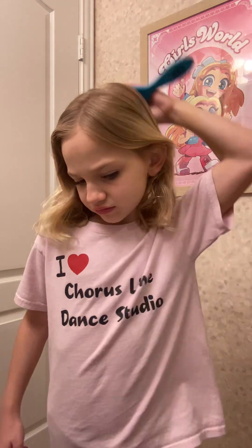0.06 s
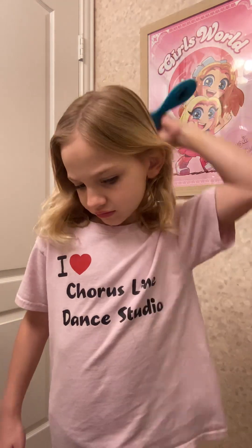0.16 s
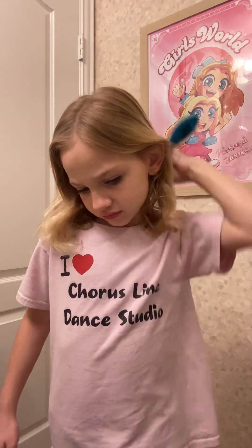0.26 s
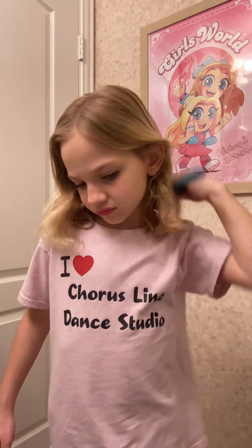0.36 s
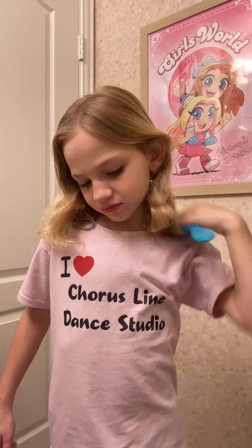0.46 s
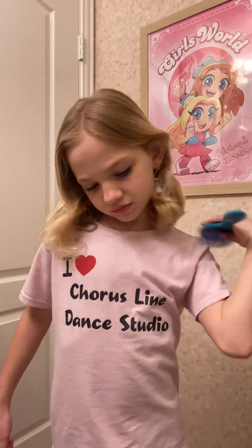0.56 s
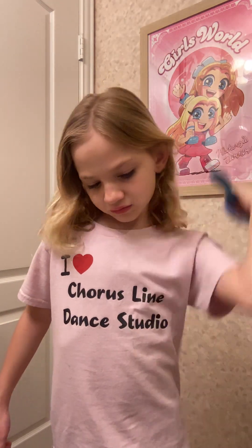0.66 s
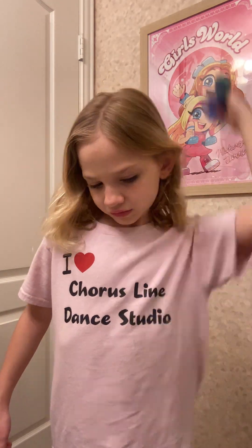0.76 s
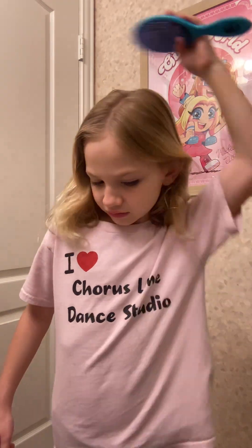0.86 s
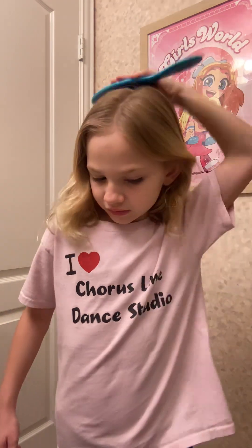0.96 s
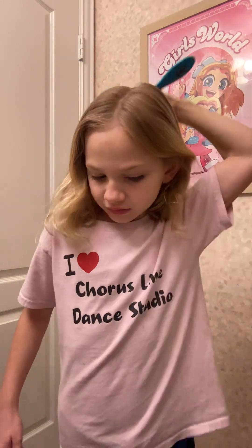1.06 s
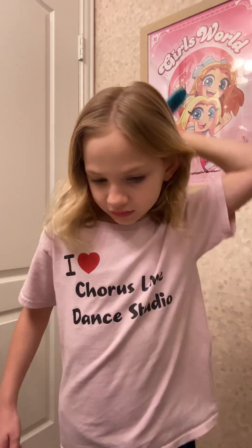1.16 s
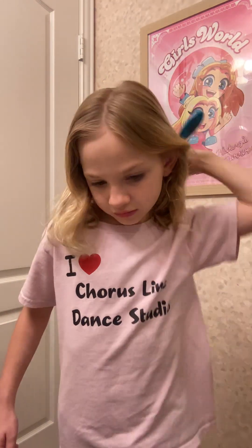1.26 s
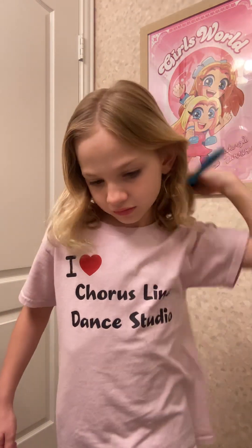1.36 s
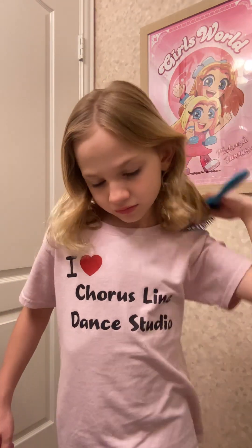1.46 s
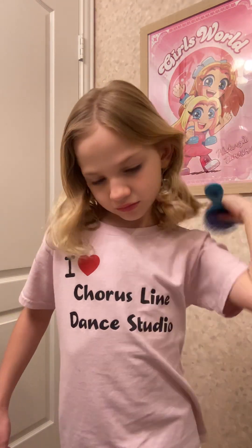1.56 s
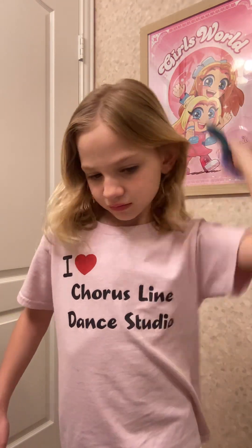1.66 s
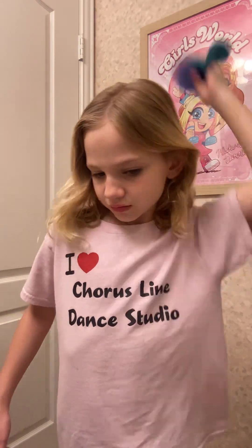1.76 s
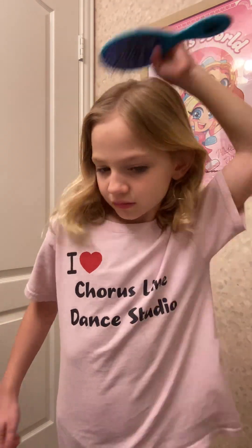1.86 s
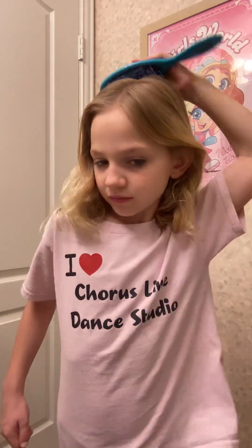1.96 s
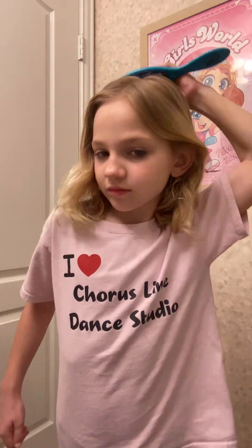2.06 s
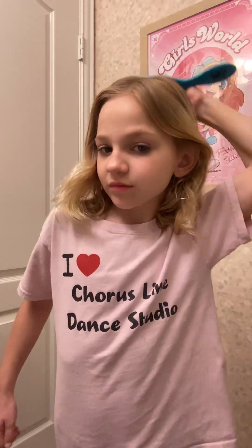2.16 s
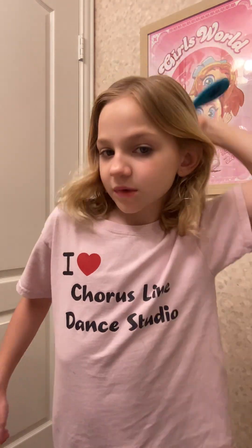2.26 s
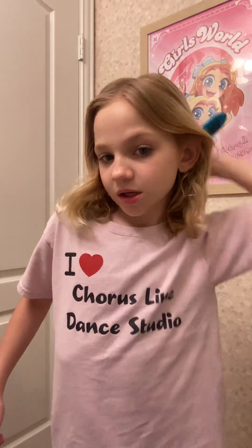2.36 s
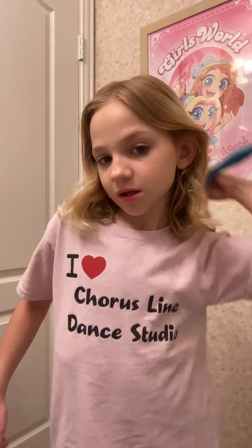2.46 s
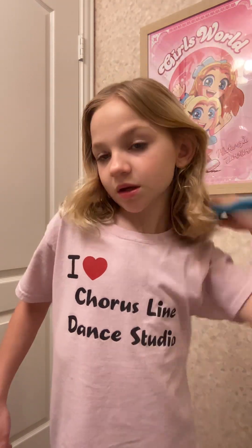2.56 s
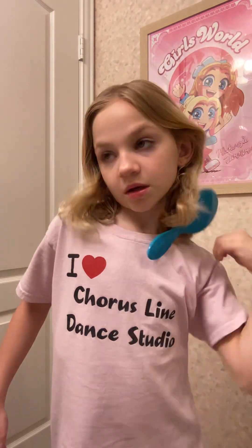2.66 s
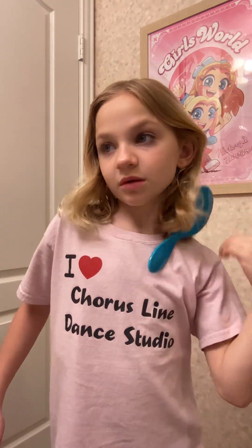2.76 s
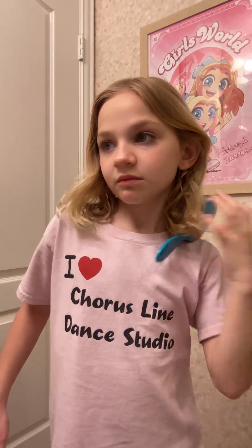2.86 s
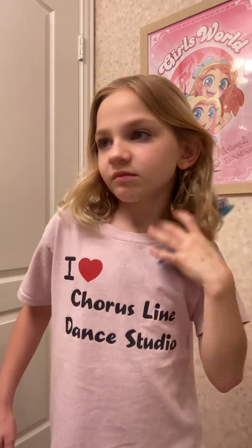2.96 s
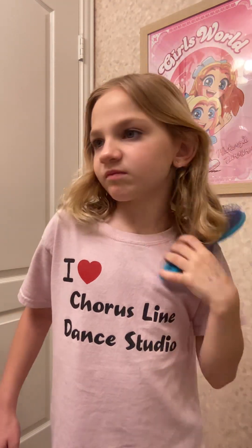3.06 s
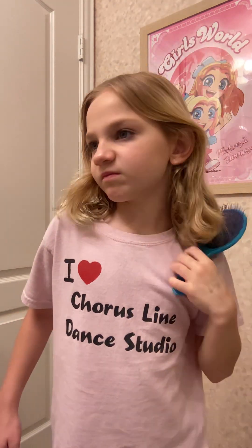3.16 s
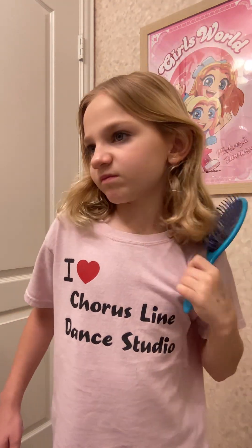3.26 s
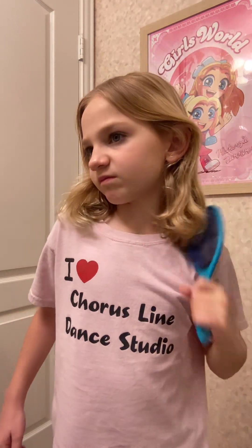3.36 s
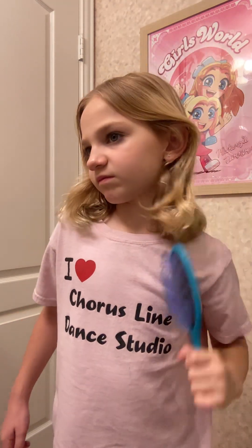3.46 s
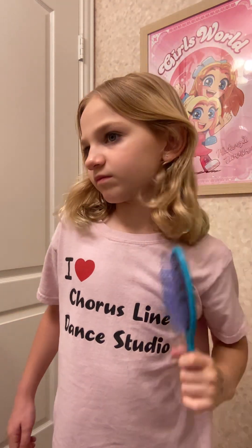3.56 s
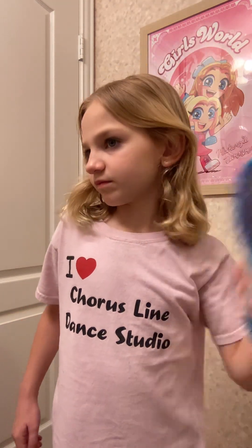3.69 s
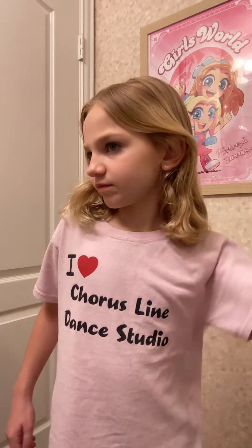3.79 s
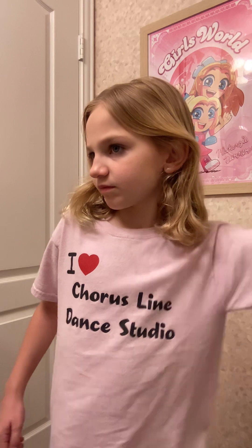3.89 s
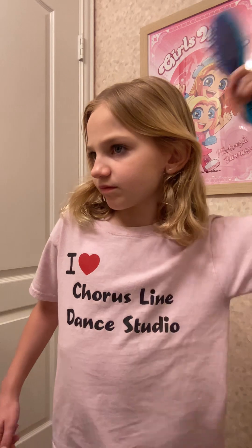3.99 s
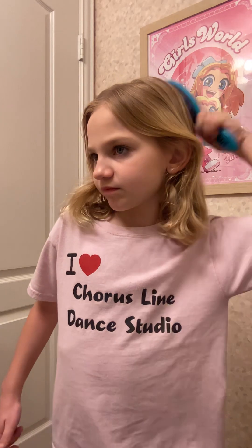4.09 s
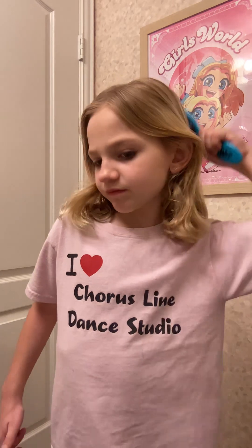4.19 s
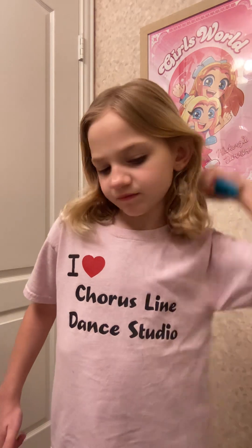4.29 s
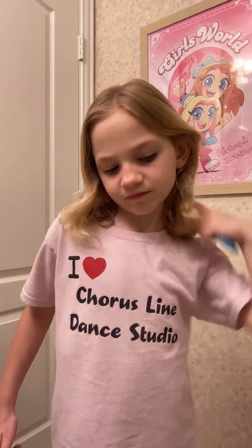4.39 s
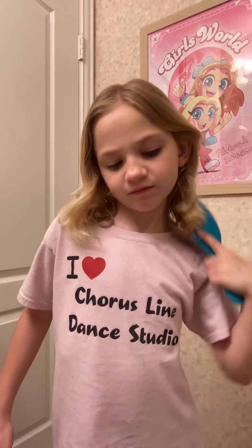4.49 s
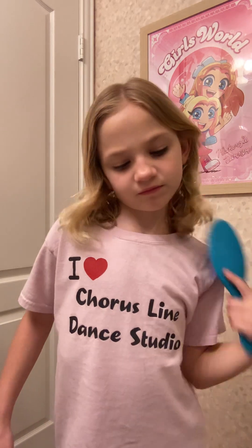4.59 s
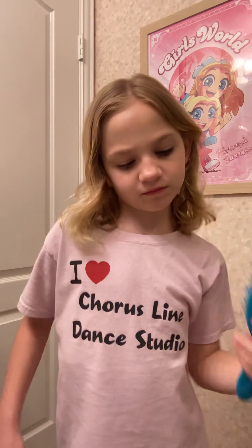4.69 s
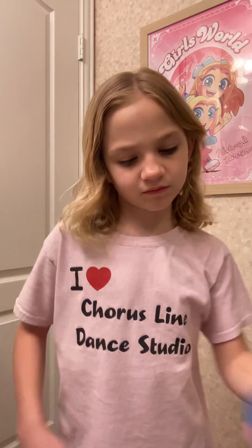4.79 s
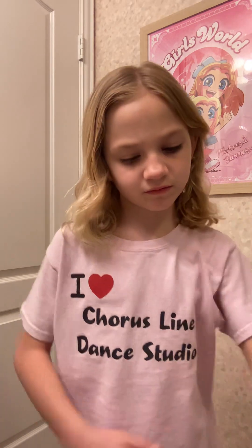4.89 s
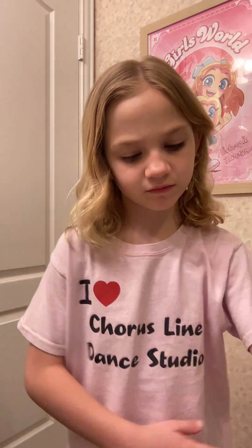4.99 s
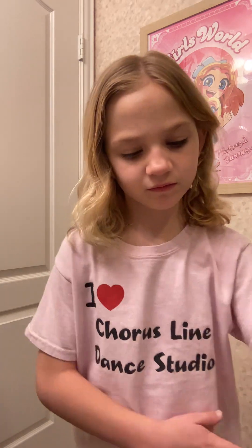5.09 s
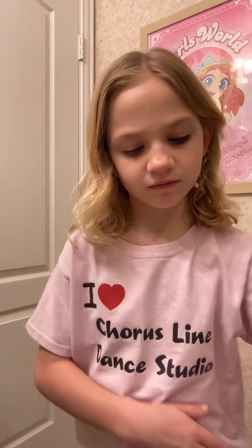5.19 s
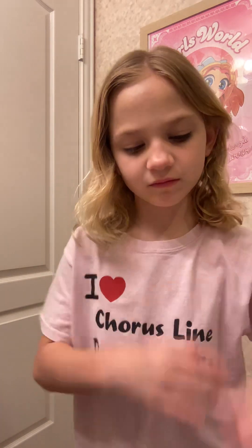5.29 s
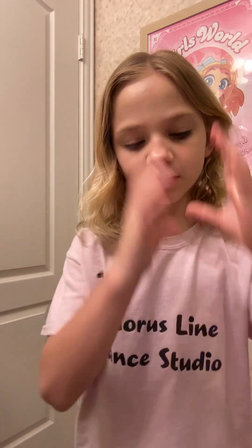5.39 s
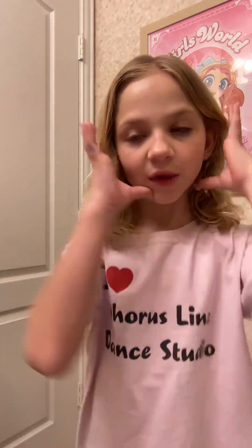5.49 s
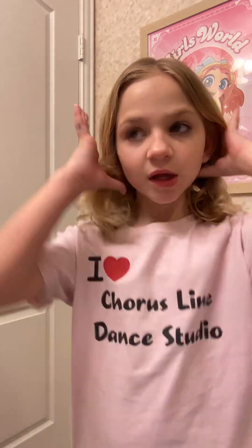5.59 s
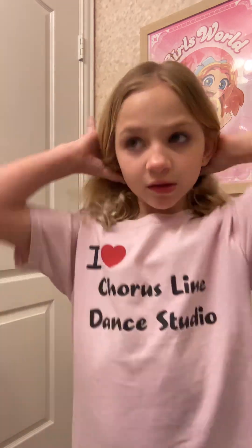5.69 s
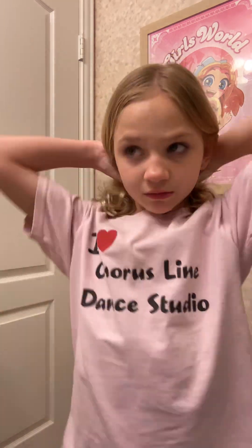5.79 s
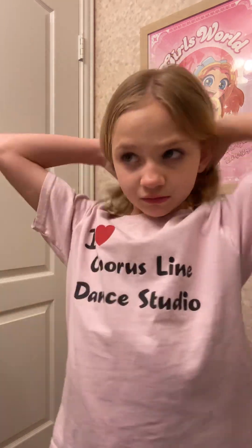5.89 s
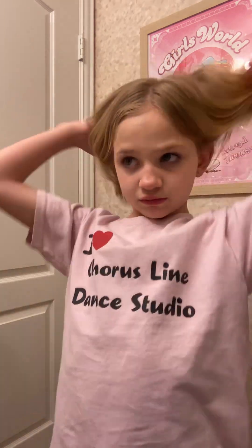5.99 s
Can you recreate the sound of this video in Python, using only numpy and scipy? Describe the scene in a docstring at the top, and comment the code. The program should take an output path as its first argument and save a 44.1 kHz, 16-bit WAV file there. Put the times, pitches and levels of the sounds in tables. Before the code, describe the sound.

A plastic hairbrush is pulled through long hair about a step from the microphone, in a small room with a short echo. Soft, scratchy strokes come at about 0 to 0.6 seconds, 1 to 1.5 seconds and, more quietly, 2.1 to 2.6 seconds. Light plastic taps and snags dot the strokes, with dull bumps against head and shoulder near 1.9 and 2.6 seconds. After a lull with one very faint rasp at 3.4 seconds, a fourth stroke runs from 4.2 to 4.6 seconds and trails off. At 4.9 seconds the brush clatters sharply onto a counter, by far the loudest sound, with smaller knocks and low thumps through the furniture until 5.3 seconds. From 5.5 to 6 seconds, a couple of tiny ticks lead into hands rustling faintly through hair. A quiet low motor hum and a thin, flickering high hiss continue underneath throughout.

```python
"""A plastic paddle brush is pulled through long hair in a small hard room, a step from the listener.
In four strokes, stick-slip friction of bristle on strand rings the paddle, which also bumps head and
shoulder. Near 5 s the brush clatters onto a counter, with dull thumps through the furniture.
Last, hands rustle through the hair. Throughout, a motor hums under a thin high hiss."""
import sys
import numpy as np
from scipy import signal
from scipy.fft import rfft, irfft
from scipy.io import wavfile
from scipy.ndimage import uniform_filter1d

SR = 44100
rng = np.random.default_rng(int(sys.argv[2]) if len(sys.argv) > 2 else 0)


def master_out(mix):
    """Clip the mix to full scale and print it as 16-bit PCM to the path in sys.argv[1]."""
    frames = np.transpose(np.atleast_2d(mix))
    ceiling = np.clip(frames, -1, 1)
    pcm = np.round(ceiling * 32767).astype(np.int16)
    wavfile.write(sys.argv[1], SR, pcm)


N = 266576
T = np.arange(N) / SR


# Friction bands in the order drone, rasp, hiss: (low edge [Hz], high edge [Hz])
FRICTION_BANDS = [(300, 1050), (1200, 3300), (4200, 12950)]
# Pulls through hair, two faint breath-like rasps and, last, fingers: (start [s], full speed [s],
# full load [s], release [s], drone gain [dB], rasp gain [dB], hiss gain [dB])
STROKE_GESTURES = [(0.021, 0.206, .4, 0.52, -47.5, -50.5, -48.5),
                   (0.952, 1.165, 1.346, 1.49, -50.5, -51.5, -49.5),
                   (2.087, 2.3, 2.344, 2.543, -57, -58, -53),
                   (3.321, 3.362, 3.42, 3.416, -65.5, -66, -70.5), (4.16, 4.292, 4.44, 4.6, -52, -52, -55),
                   (4.624, 4.64, 4.66, 5.06, -73.5, -67, -82),
                   (5.606, 5.94, 5.93, 6.03, -79.5, -67.5, -62.5)]
def strokes():
    """Friction noise: drone and rasp grow with load, hiss with speed; snags make each band uneven."""
    touch_s, release_db_per_s, snag_db = 0.032, 265.5, 2
    onset_db = np.array([[-19.5], [-10], [-17]])  # per band, relative to full drive
    gains = np.zeros((3, N))
    for start, fast, loaded, release, *full_db in STROKE_GESTURES:
        speed, load = (np.clip((T - start) / (full - start), 0, 1) for full in (fast, loaded))
        drive = np.array([load, load, speed])
        db = np.array(full_db)[:, None] + onset_db * (1 - drive)
        db -= release_db_per_s * np.maximum(T - release, 0)
        gains += np.clip((T - start) / touch_s, 0, 1) * undb(db)
    out = 0
    for gain, (lo, hi), bare_db in zip(gains, FRICTION_BANDS, (5, 0.5, 0.5)):
        rub = paddle(slips()) + undb(bare_db) * slips()  # some slips ring the paddle, others are bare
        snags = undb(snag_db * walk(40))
        out += gain * snags * level(band(rub, lo, hi), -8)
    return out


def slips(per_s=4000, spread_db=2.5):
    """Stick-slip friction: bristles slip over strands in a Poisson train of uneven impulses."""
    slipping = rng.random(N) < per_s / SR
    return slipping * rng.standard_normal(N) * undb(spread_db * rng.exponential(size=N))


# Modes of paddle and cushion: (frequency [Hz], relative level [dB], decay time T60 [s])
PADDLE_MODES = [(381, -2.5, 0.028), (874, 4, 0.012), (1130, -32.5, 0.0076), (1390, -12, 0.012),
                (1830, -7, 0.023), (2137, 0.5, 0.015), (2574, 6.5, 0.0072), (3393, -1.5, 0.012),
                (3860, -5, 0.0089), (5120, -9, 0.015), (5630, -5.5, 0.0082), (7080, -2.5, 0.014),
                (9150, -27, 0.0082)]
def paddle(force):
    """Modal superposition: the force is convolved with a unit-energy sum of damped sinusoids."""
    t = T[:SR // 8]
    ring = sum((-1) ** k * undb(db) * np.sin(2 * np.pi * hz * t) * 1000 ** (-t / t60)
               for k, (hz, db, t60) in enumerate(PADDLE_MODES))
    return convolve_unit_energy(force, ring)


# Bumps, snags and clatter of the brush: (time [s], gain [dB], hardness tilt [dB/octave],
# spot resonance [Hz], its width [Hz], its level over the rattle [dB], contact decay time [ms])
IMPACTS = [(.012, -54, -3, 774, 403, 10, 4.5), (.132, -48.5, 4, 5050, 3020, -1.5, 3.4),
           (.212, -67, 3, 705, 200, 12, 3.3), (.324, -57.5, -3, 3440, 60, 7, 9.9),
           (.488, -48.5, 2, 2240, 1500, 8.5, 3.7), (.965, -54.5, -3, 740, 350, 10.5, 5.8),
           (1.005, -57, -3.5, 660, 200, 9, 5.3), (1.132, -42.5, 9, 533, 200, -16, 2.3),
           (1.29, -50.5, -6, 824, 200, 3.5, 3.3), (1.399, -47, 1, 2430, 300, -5, 5.5),
           (1.429, -46, 1, 3480, 400, -8, 4.8), (1.909, -41.5, -0.8, 1574, 497, -9, 5.8),
           (2.275, -52.5, 3, 2630, 252, 19.5, 1.47), (2.379, -55, 4, 910, 300, 2.5, 3.2),
           (2.584, -40, -0.5, 1590, 596, -1.5, 3.8), (2.642, -52.5, -7, 565, 900, 2.5, 6.3),
           (2.979, -69.5, -11, 640, 298, 1.5, 4.3), (3.399, -72, -2, 734, 300, -3, 4.3),
           (4.102, -63, -2, 445, 407, 5, 5.7), (4.423, -46, 13, 700, 200, -9, 2.3),
           (4.631, -55.5, -0.5, 4000, 2000, 0.5, 3), (4.916, -17.5, 0.5, 880, 300, -1, 2.38),
           (4.928, -20, 2.2, 1800, 1000, 3, 2.15), (5.026, -27.5, 1, 2700, 200, -4.5, 1.8),
           (5.037, -31, 5, 1830, 200, -7.5, 2.5), (5.126, -43, -4, 2120, 1160, 0.5, 9.1),
           (5.223, -37, -2.5, 1110, 700, 7.5, 4.9), (5.236, -29, 1.5, 382, 250, 17, 1.31),
           (5.246, -31, -1, 5330, 1500, -0.5, 3.53), (5.258, -34.5, -1, 2370, 1210, 6.5, 3.5),
           (5.309, -38, -3, 397, 149, 11, 3.07), (5.516, -62, 12.5, 7500, 3060, 7, 1.8),
           (5.549, -55, 1.5, 4010, 4500, 16.5, 1.3), (5.863, -66, -8, 600, 494, -0.5, 4.7)]
def bumps(rise_ms=1.06, low_hz=227, top_hz=11700, bare_db=4):
    """Impact excitation: brief rattles of contacts, brighter when harder; the struck spot resonates."""
    t = T[:SR // 10]
    hz = np.maximum(np.fft.rfftfreq(len(t), 1 / SR), 1)
    highpass = 1 / (1 - 1j * low_hz / hz) ** 2
    lowpass = 1 / (1 - (hz / top_hz) ** 2 + 1j * hz / top_hz) ** 2
    rise = 1 - np.exp(-t * 1000 / rise_ms)
    force = np.zeros((2, N + len(t)))  # one row drives the paddle, the other is heard bare
    for s, db, hardness, spot_hz, width_hz, spot_db, decay_ms in IMPACTS:
        envelope = rise * np.exp(-t * 1000 / decay_ms)
        burst = rfft(rng.standard_normal((2, len(t))) * envelope)
        # many contacts together excite all frequencies evenly
        local_power = uniform_filter1d(np.abs(burst) ** 2, size=25)
        burst *= np.sqrt(np.sum(envelope ** 2) / local_power)
        rattle = level(highpass * lowpass * undb(hardness * np.log2(hz)) / np.sqrt(hz), 0)
        spot = level(1 / (1 + 1j * (hz - spot_hz ** 2 / hz) / width_hz) ** 2, spot_db)
        ringing, bare = burst * rattle
        contacts = irfft(np.array([ringing, bare + burst[0] * spot]), len(t)) * (t < t[-1] / 2)
        onset = int(s * SR)
        force[:, onset:onset + len(t)] += undb(db) * contacts
    return paddle(force[0, :N]) + undb(bare_db) * force[1, :N]


# Blows through body and furniture: (time [s], gain [dB], frequency [Hz], decay time T60 [s])
LOW_BLOWS = [(1.932, -43, 90, 0.065), (2.654, -30, 123, 0.14), (2.69, -39, 109.5, 0.13),
             (4.929, -39, 169, 0.26), (5.239, -45, 92, 0.13), (5.304, -36, 128, 0.23)]
def thumps(roughness_db=3.5):
    """Damped oscillation: each soft blow swells over one cycle and dies away with an uneven level."""
    out = np.zeros(N)
    for s, db, hz, t60 in LOW_BLOWS:
        t = np.maximum(T - s, 0)
        envelope = (1 - np.exp(-t * hz * 3.7)) * 1000 ** (-t / t60)
        out += undb(db) * envelope * np.sin(2 * np.pi * hz * t)
    return out * undb(roughness_db * walk(76))


# Reverberation bands: (low edge [Hz], high edge [Hz], relative level [dB], decay time T60 [s])
ROOM_BANDS = [(155, 349, 5, 0.41), (477, 2080, 7, 0.32), (2805, 6010, 8.5, 0.29), (7860, 19100, 7, 0.22)]
def room(direct, echo_db=6, first_wall_ms=1.04):
    """Diffuse reverberation: treble dies first; four responses blend at random as the brush moves."""
    t = T[:SR // 2]
    build_up = np.clip(t * 1000 / first_wall_ms, 0, 1) ** 2
    shares = np.array([walk(6) for _ in range(4)])
    shares /= np.sqrt(np.sum(shares ** 2, axis=0))
    out = direct.copy()
    for share in shares:
        noise = rng.standard_normal(len(t))
        echo = sum(undb(db) * band(noise, lo, hi) * 1000 ** (-t / t60) for lo, hi, db, t60 in ROOM_BANDS)
        out += undb(echo_db) * convolve_unit_energy(direct * share, echo * build_up)
    return out


def treble_rolloff(x, corner_hz=9500):
    """First-order low-pass: the highest treble of the brush is softened."""
    return signal.sosfilt(signal.butter(1, corner_hz, fs=SR, output="sos"), x)


# Motor harmonics: (frequency [Hz], median rms level [dB])
MOTOR_HARMONICS = [(120, -56.5), (240, -80)]
def motor_hum(waver_db=2.1):
    """Amplitude modulation: the motor's fundamental and octave waver together."""
    tone = sum(np.sqrt(2) * undb(db) * np.sin(2 * np.pi * hz * T) for hz, db in MOTOR_HARMONICS)
    return tone * undb(waver_db * walk(25))


# Spectrum of the background noise: (frequency [Hz], relative spectral density [dB])
NOISE_SPECTRUM = [(20, -33.5), (35, -48.5), (55, -11.5), (95, -10), (120, -19.5), (150, -13.5),
                  (200, -18.5), (270, -26.5), (400, -33.5), (2300, -41), (8000, -49), (9800, -40),
                  (11200, -27.5), (12500, -48.5), (15800, -55)]
# The high hiss swells, sinks for a while and returns: (time [s], gain [dB])
HISS_CONTOUR = [(1, -6), (4.2, 0.5), (4.6, -23), (4.9, -10), (5.45, -4), (5.8, -0.5)]
def rumble_and_hiss(flicker_db=2.2):
    """Spectral shaping: white noise is weighted into a low rumble and a high hiss that flickers."""
    hz = np.maximum(np.fft.rfftfreq(N, 1 / SR), 1)
    knot_hz, knot_db = np.transpose(NOISE_SPECTRUM)
    shape = undb(np.interp(np.log(hz), np.log(knot_hz), knot_db))
    noise = level(irfft(rfft(rng.standard_normal(N)) * shape, N), -66)
    hiss = band(noise, 8000, 13600)
    hiss_gain = undb(flicker_db * walk(160) + np.interp(T, *np.transpose(HISS_CONTOUR)))
    return noise + hiss * (hiss_gain - 1)


def undb(db):
    """Decibel scale: 20 dB is a tenfold amplitude."""
    return 10 ** (np.asarray(db) / 20)


def level(x, db):
    """Normalisation of a signal or spectrum to an rms level."""
    return x * undb(db) / np.sqrt(np.mean(np.abs(x) ** 2))


def band(x, lo_hz, hi_hz):
    """Band-pass filtering with a maximally flat passband."""
    edges_hz = [lo_hz, min(hi_hz, .45 * SR)]
    return signal.sosfilt(signal.butter(2, edges_hz, "band", fs=SR, output="sos"), x)


def walk(rate_hz):
    """Sample and hold: random steps, smoothed twice, with a spread near 1."""
    hold = int(SR / rate_hz)
    steps = np.repeat(rng.standard_normal(N // hold + 1), hold)
    return 1.32 * uniform_filter1d(uniform_filter1d(steps, hold), hold)[:N]


def convolve_unit_energy(x, response):
    """Linear system: convolution with an impulse response scaled to unit energy."""
    return signal.fftconvolve(x, response / np.sqrt(np.sum(response ** 2)))[:N]


def scene():
    """Superposition: the brush in the room, its thumps and the background add in one channel."""
    brush = treble_rolloff(room(strokes() + bumps()))
    return (brush + thumps() + rumble_and_hiss() + motor_hum())[None]


def record(dry):
    """Band limiting: a phone microphone cuts the deep bass and the top of the treble."""
    low_cut_hz, top_hz = 52, 15750
    thin = signal.sosfilt(signal.butter(4, low_cut_hz, "highpass", fs=SR, output="sos"), dry)
    return signal.sosfilt(signal.ellip(10, .2, 70, top_hz, fs=SR, output="sos"), thin)


dry = scene()
out = record(dry)
master_out(out)
```